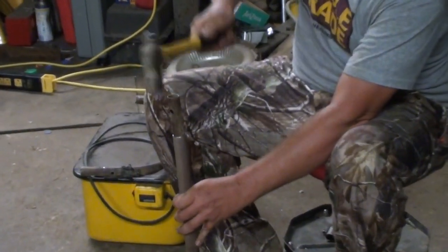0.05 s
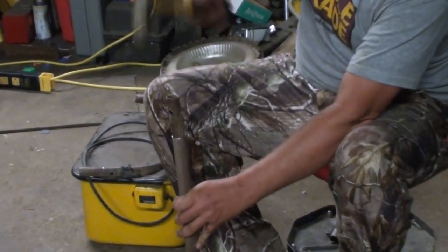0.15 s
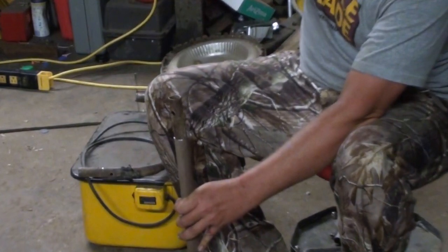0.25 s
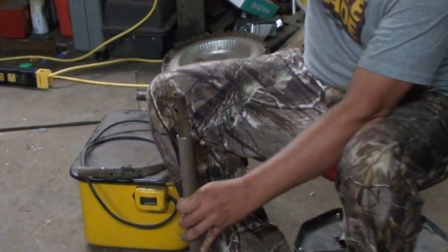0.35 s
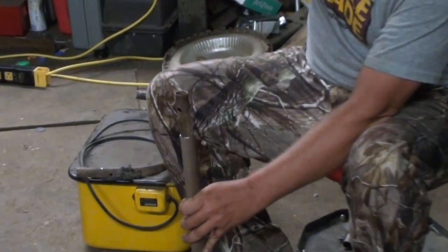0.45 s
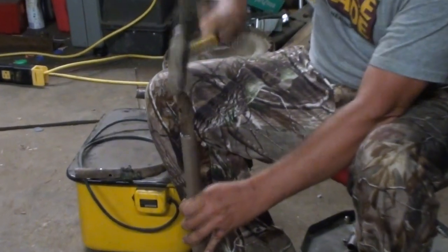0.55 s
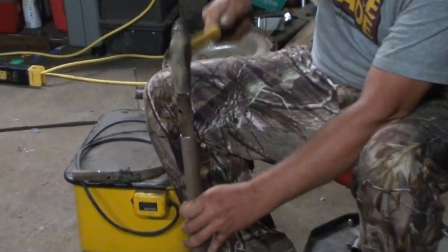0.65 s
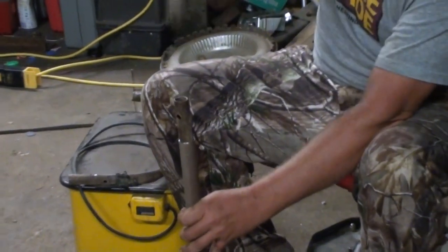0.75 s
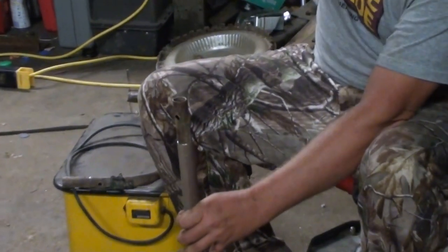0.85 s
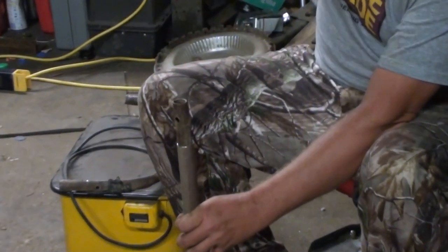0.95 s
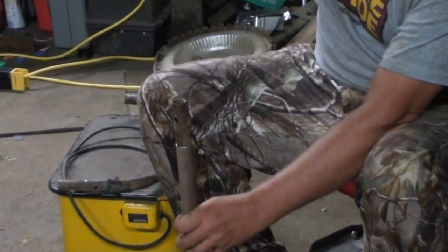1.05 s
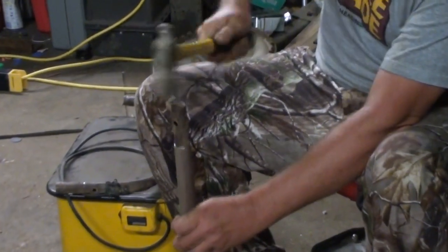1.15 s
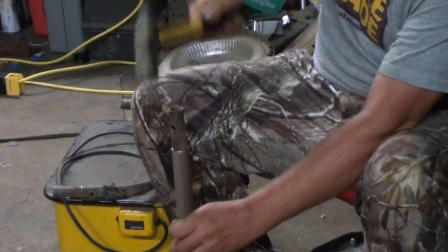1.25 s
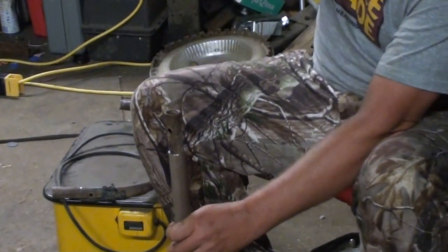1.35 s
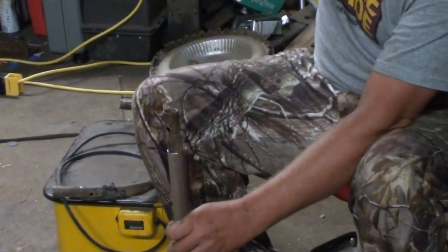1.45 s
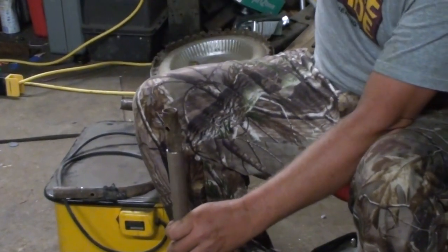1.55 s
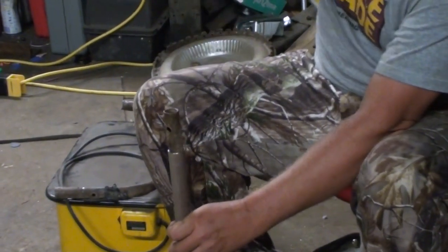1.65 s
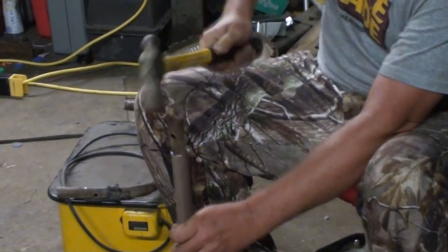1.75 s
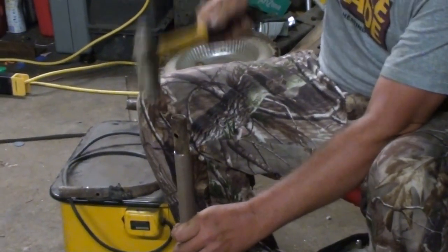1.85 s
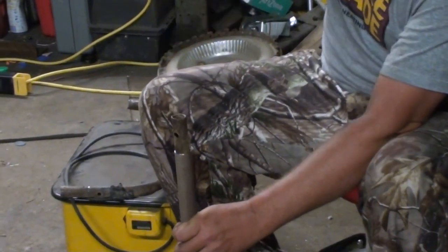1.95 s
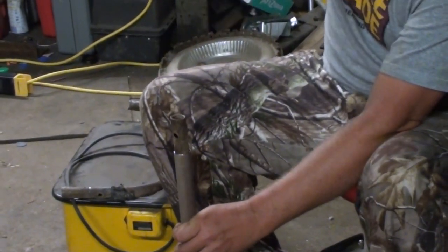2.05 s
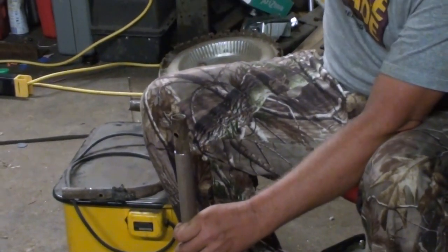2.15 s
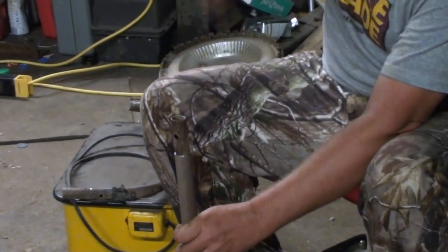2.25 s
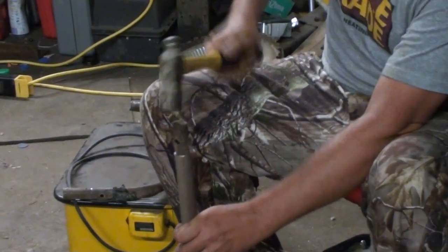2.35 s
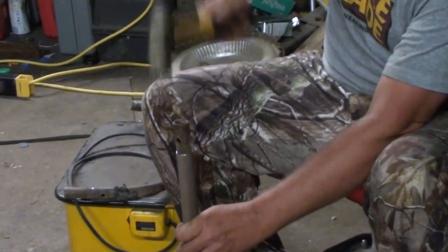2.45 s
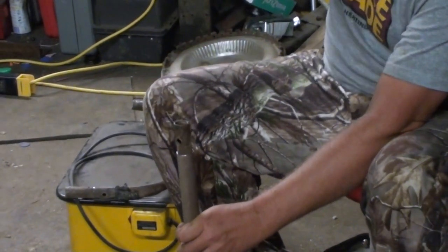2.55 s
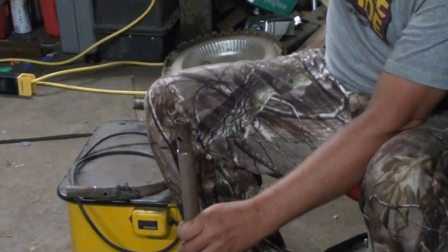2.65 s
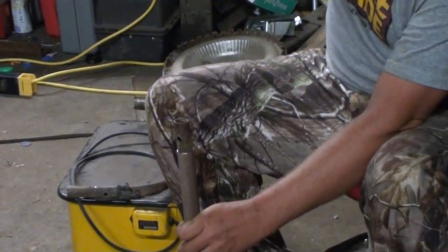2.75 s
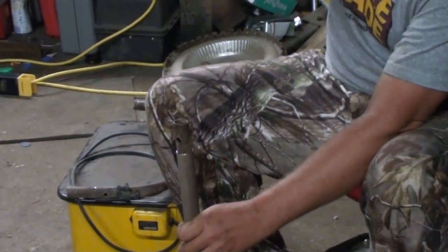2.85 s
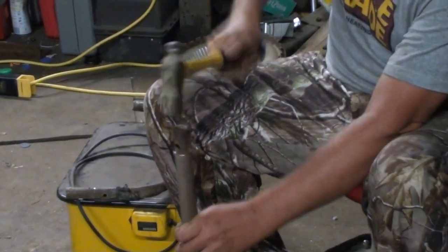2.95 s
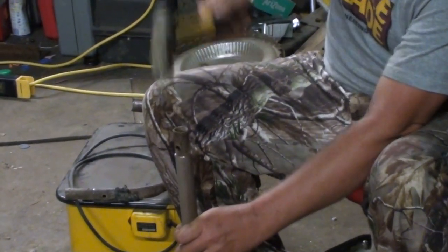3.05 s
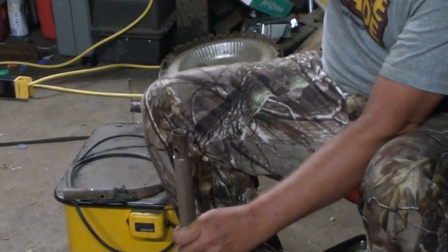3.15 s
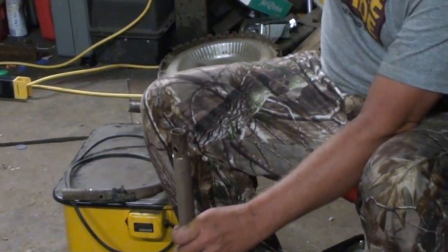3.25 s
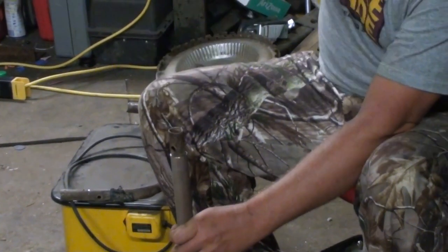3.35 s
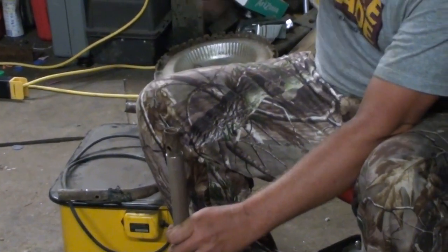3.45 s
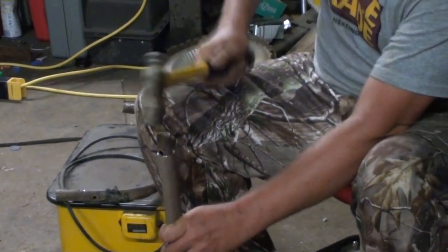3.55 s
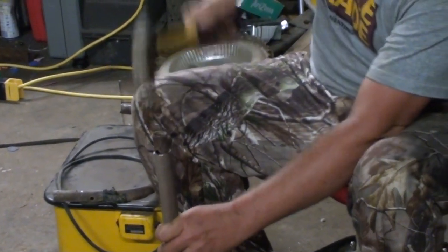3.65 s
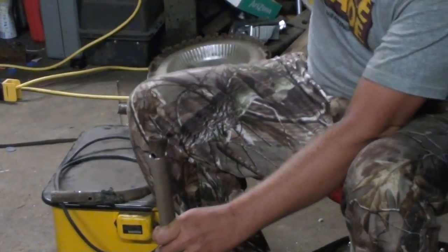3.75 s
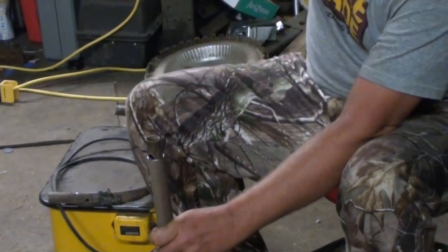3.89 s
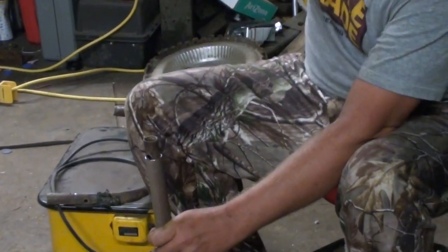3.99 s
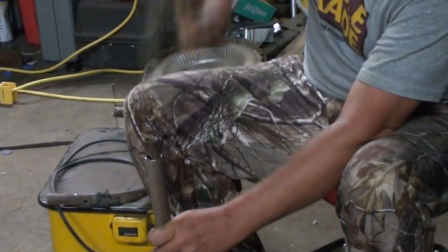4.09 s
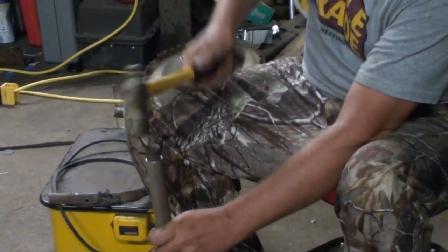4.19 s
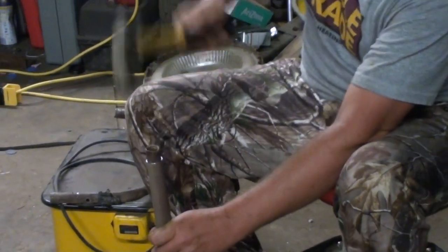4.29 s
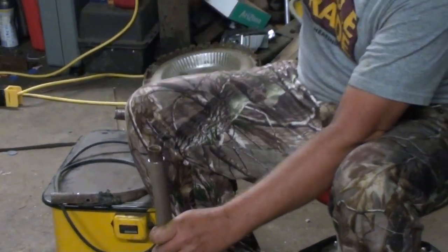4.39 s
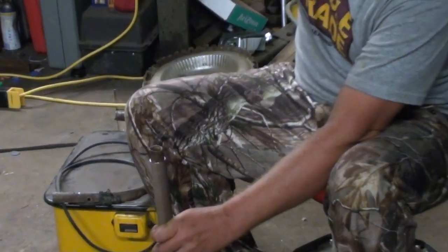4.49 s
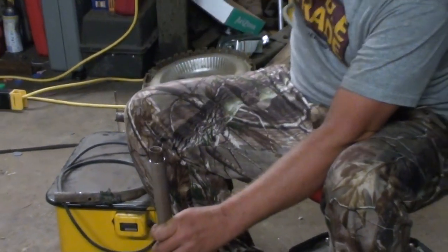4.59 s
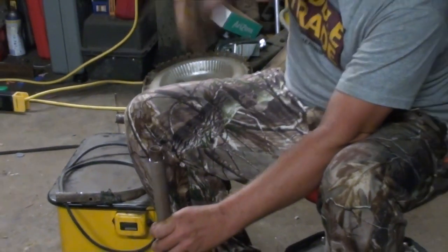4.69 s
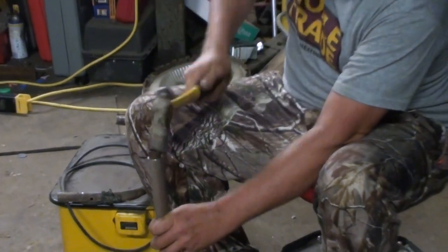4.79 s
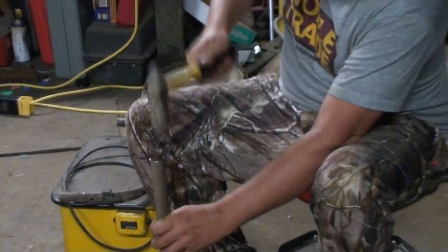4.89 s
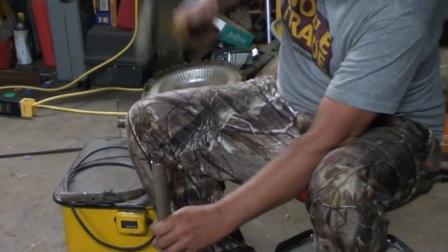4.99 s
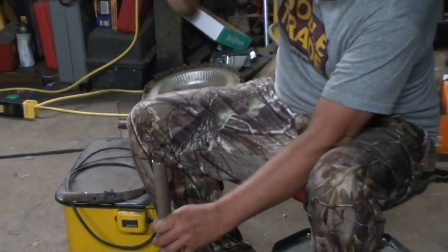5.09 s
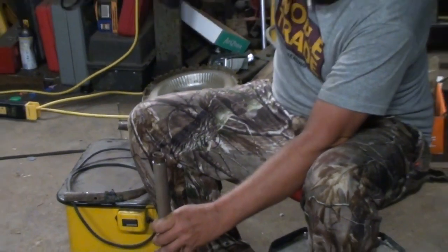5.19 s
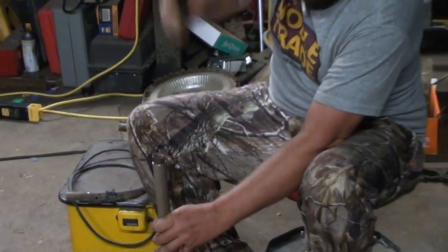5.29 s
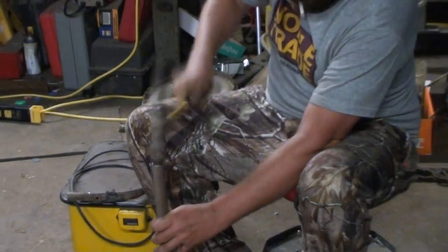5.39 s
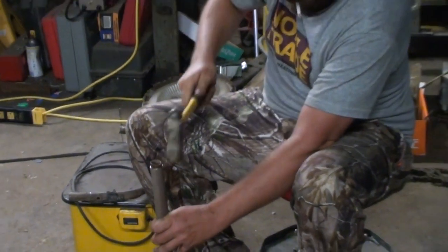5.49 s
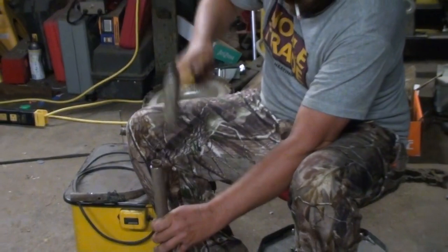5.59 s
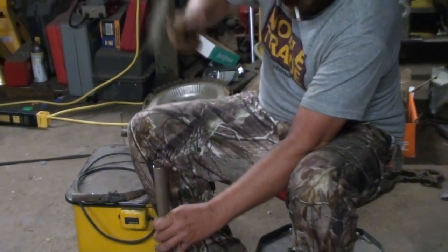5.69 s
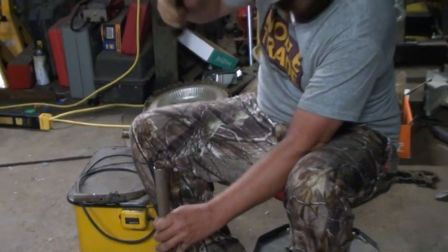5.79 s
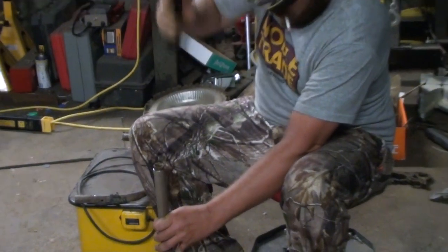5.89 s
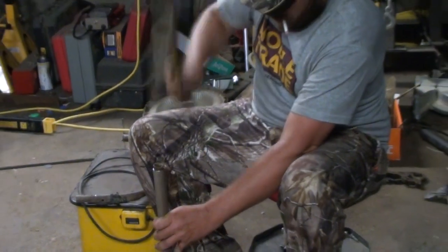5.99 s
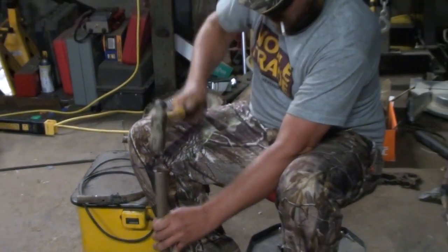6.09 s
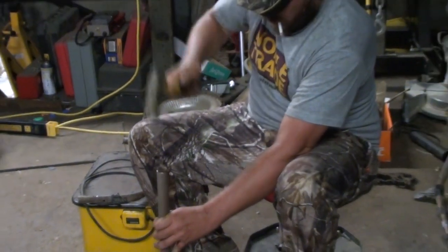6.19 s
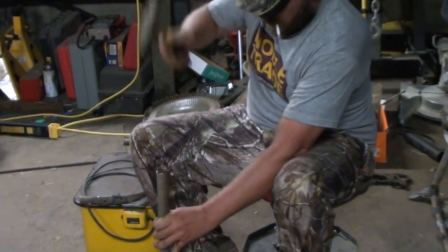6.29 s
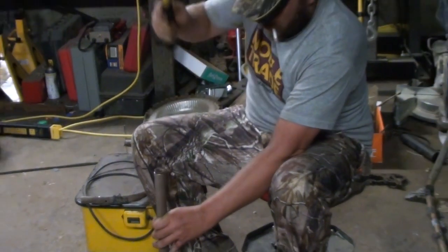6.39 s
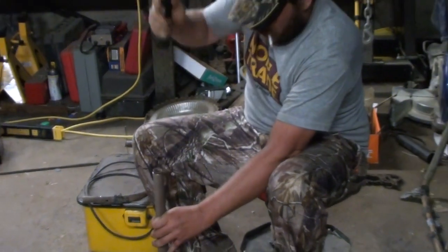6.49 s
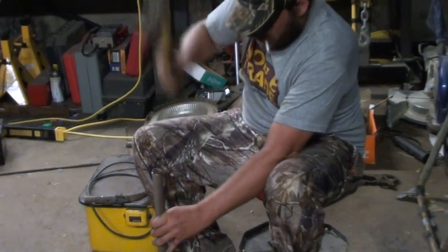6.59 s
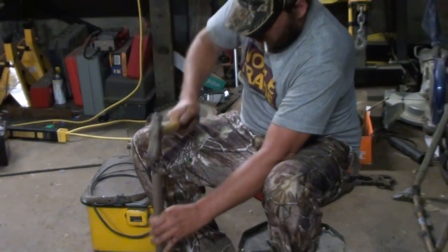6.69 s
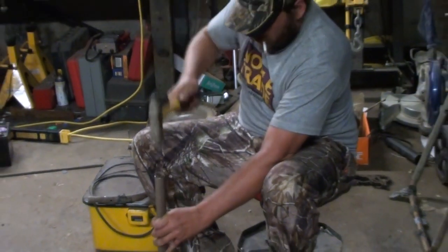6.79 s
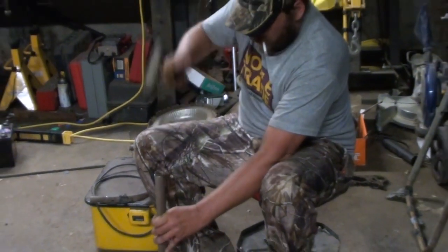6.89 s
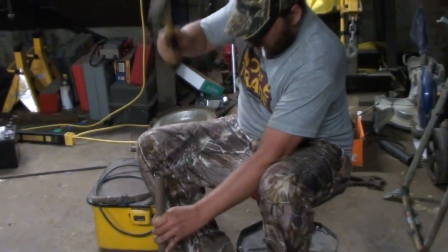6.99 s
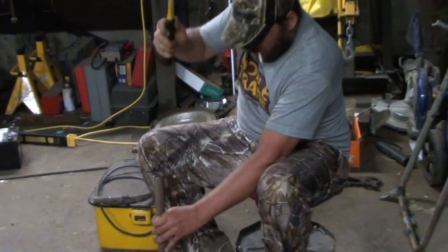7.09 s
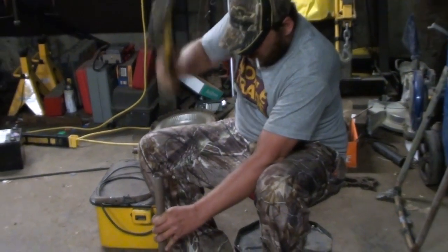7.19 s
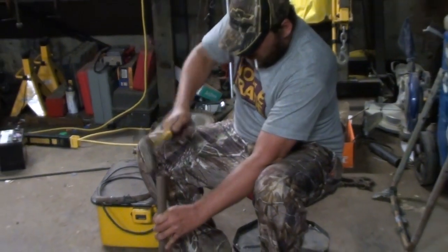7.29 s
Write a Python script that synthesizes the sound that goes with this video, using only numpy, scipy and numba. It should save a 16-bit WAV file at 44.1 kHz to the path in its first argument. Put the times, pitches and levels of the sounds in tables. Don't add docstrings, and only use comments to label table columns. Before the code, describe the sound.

Close by in a large, hard-walled garage, a hammer hits the end of a gripped steel tube at a steady 0.6-second pace. Each clank is sharp and bright, its own ring choked at once, leaving a dense echoing tail that overlaps the next blow. A hollow plastic case nearby answers with a dull low thump. Soft wind buffets the stereo microphone, whose limiting holds the tails up loud.

```python
import sys
import numpy as np
from scipy import signal
from scipy.fft import rfft, irfft, next_fast_len
from scipy.io import wavfile
from scipy.ndimage import uniform_filter1d, minimum_filter1d
from numba import njit

SR = 44100
rng = np.random.default_rng(int(sys.argv[2]) if len(sys.argv) > 2 else 0)


def boost_factor(decibels):
    exponent = np.asarray(decibels, float) / 20
    return 10 ** exponent


def log_audio(samples):
    frames = np.atleast_2d(samples).T
    limited = np.clip(frames, -1, 1)
    pcm = np.round(limited * 32767).astype(np.int16)
    wavfile.write(sys.argv[1], SR, pcm)


N = 323587
LEAD = SR

# t/s, strength/dB, thud/dB, body/dB, brightness/dB
BLOWS = [(0.067, 8.5, -4, -0.5, -1.5), (0.649, 9, -5.5, 0.5, -1), (1.223, 4.5, -0.7, 2, 3.3),
         (1.816, 7.5, -4, -1.5, 0), (2.408, 7, -2, -1.5, -1), (3.008, 8, -2.5, -0.5, 1),
         (3.614, 8.5, -3, -0.5, 2), (4.215, 4.5, 0, 2, 2), (4.848, 5.5, -1.5, 3.5, -2),
         (5.498, 8, -3, 3, 0), (6.134, 8.5, -0.2, 3.5, 0.5), (6.7656, 6, 4, 9, -2.5)]
EARLIER_BLOW = (-0.5, 8.5, -6, -1, -1)
# f/Hz, f/Hz, f/Hz, f/Hz, f/Hz
TUBE_MODES = [(3220, 1960, 1080, 9450, 8500), (3110, 3500, 2320, 4620, 1100),
              (5900, 1870, 1150, 6970, 5400), (6960, 2560, 6250, 3030, 8600),
              (6130, 7670, 5470, 9100, 4470), (6430, 1390, 7550, 2200, 4400),
              (8600, 1340, 3240, 6830, 2000), (7670, 8370, 6550, 8050, 3290), (5060, 943, 4030, 1680, 6450),
              (4430, 2710, 1520, 2180, 770), (2790, 2660, 1830, 9500, 9800), (2146, 2660, 9700, 5250, 6600)]
EARLIER_MODES = (2000, 3120, 4400, 6250, 8000)
# f/Hz, level per Hz/dB
STEEL_CRACK = [(59, -56), (100, -23.5), (255, -21.5), (302, -18.5), (343, -18), (398, -14.5), (600, -22.5),
               (900, -12.5), (1870, -2), (3120, -3.5), (3860, -4.5), (6840, -4), (14400, -32), (16000, -32)]
# f/Hz, level/dB
CLOSE_BRIGHTNESS = [(250, 4), (1500, -1.5), (3000, -2), (5000, -1.5), (8000, 4.5), (10000, 3.5), (14000, 5)]
# f/Hz, T60/s
HALL_T60 = [(100, 0.82), (400, 0.73), (1000, 0.91), (2500, 0.96), (5500, 0.85), (9000, 0.66), (14000, 0.42)]
# f/Hz, level/dB
HALL_COLOUR = [(300, 1), (5000, 0), (9000, -3), (14000, -5)]
# delay/s, level/dB
EARLY_ECHOES = [(.0025, -3), (.005, -4), (.008, -14), (0.013, -6), (0.019, -2.5), (0.028, -4), (0.035, -3)]
# f/Hz, side minus mid/dB
STEREO_WIDTH = [(60, -24), (110, -42), (200, -42), (380, -26), (700, -21), (1290, -19), (2380, -17),
                (4400, -13), (8120, -14), (15000, -27)]
# f/Hz, level per Hz/dB
PORT_TURBULENCE = [(12, -26), (20, -16), (57, 0.5), (129, 7), (370, -11), (409, -23), (464, -8.5),
                   (528, -64), (600, -48), (780, -48), (1320, -120)]
# f/Hz, side minus mid/dB
PORT_WIDTH = [(25, -17), (60, -17), (130, -8), (300, -3.5)]
# peak t/s, length/s, level/dB
GUSTS = [(0.0, 0.067, -39), (0.2, 0.068, -43), (0.543, 0.065, -38.5), (2.755, 0.21, -43),
         (2.886, 0.062, -30.5), (2.956, .05, -33), (3.082, .12, -49), (3.32, 0.11, -34.5),
         (3.445, 0.21, -42.5), (3.695, .1, -33), (3.776, 0.17, -32), (3.86, 0.11, -34), (3.987, 0.055, -37),
         (4.075, 0.15, -39.5), (4.427, 0.19, -32.5), (4.543, 0.14, -45), (4.672, 0.17, -47),
         (4.78, 0.066, -26.5), (5.34, 0.038, -37), (5.48, .1, -41), (5.663, 0.11, -42), (5.82, .08, -37.5),
         (6.117, 0.041, -44), (6.182, 0.11, -30), (6.27, 0.17, -32), (6.413, 0.15, -35.5),
         (6.619, 0.21, -46), (6.817, 0.097, -37), (6.994, .2, -51), (7.34, 0.031, -39)]
# t/s, level/dB
BREEZE = [(0, -62), (0.7, -78), (2.2, -82), (2.4, -52), (5.0, -50), (6.0, -49), (7.34, -59)]
# f/Hz, level per Hz/dB
GARAGE_AIR = [(30, -26), (100, -7), (190, -11), (224, 3), (260, -2.5), (450, -3.5), (700, -7), (2500, -4.5),
              (7000, -31), (10000, -34), (16000, -28)]

GUST_RISE = 0.64
STRONGEST_MODE_DB, MODE_STEP_DB = 7.5, 1.08
MODE_WIDTH_HZ, MODE_WIDENING = 156, 0.034
MIC_TOP_HZ, STEREO_TOP_HZ = 15900, 10800


def set_rms(x, db):
    return x * boost_factor(db) / np.sqrt(np.mean(x ** 2))


def on_log(table, hz):
    f, value = np.transpose(table)
    return np.interp(np.log(hz + 1), np.log(f), value)


def colour(x, table):
    length = x.shape[-1]
    n = next_fast_len(length)
    gain = boost_factor(on_log(table, np.fft.rfftfreq(n, 1 / SR)))
    return irfft(rfft(x, n) * gain, n)[..., :length]


def resonance(hz, centre_hz, width_hz):
    damping = 1j * hz * width_hz
    return damping / (centre_hz ** 2 - hz ** 2 + damping)


def walk(rate_hz):
    hold = int(SR / rate_hz)
    steps = np.repeat(rng.standard_normal(N // hold + 1), hold)
    return 1.2 * uniform_filter1d(steps, hold)[:N]


def clank(thud_db, body_db, bright_db, modes, size=2048):
    t, hz = np.arange(size) / SR, np.fft.rfftfreq(size, 1 / SR)
    chance = rng.standard_normal((2, size))
    lag = 0.0042 + 0.0045 * uniform_filter1d(chance[0, :len(hz)], size=12)
    click = np.exp(-2j * np.pi * np.cumsum(np.maximum(lag, 0.0025)) * SR / size)
    chatter = rfft(chance[1] * t ** 2 * np.exp(-t / 0.002))
    chatter = boost_factor(-18) * chatter / np.sqrt(np.mean(np.abs(chatter) ** 2))

    peaks_db = np.maximum(STRONGEST_MODE_DB - MODE_STEP_DB * np.arange(len(modes)), 0)
    power = 1
    for f, db in zip(modes, peaks_db):
        mode = resonance(hz, f, MODE_WIDTH_HZ + MODE_WIDENING * f)
        power = power + (boost_factor(2 * db) - 1) * np.abs(mode) ** 3
    ring = np.sqrt(power)

    touch = [(350, thud_db), (850, body_db), (2200, 0), (6500, 0), (10000, bright_db)]  # f/Hz, level/dB
    steel_db = on_log(STEEL_CRACK, hz) + on_log(CLOSE_BRIGHTNESS, hz) + on_log(touch, hz)
    sound = irfft((click + chatter) * ring * boost_factor(steel_db), size)
    return sound * np.minimum(t / 0.0018, 1) ** 2


def hall(tail_db, size=32768):
    t, hz = np.arange(size) / SR, np.fft.rfftfreq(size, 1 / SR)
    noise, tail = rfft(rng.standard_normal(size)), 0
    for centre in 60 * 2 ** np.arange(0, 8.5, 0.5):
        band = np.cos(np.pi * np.clip(np.log2((hz + 1) / centre), -0.5, 0.5)) ** 2
        decay = np.exp(-np.log(1000) * t / on_log(HALL_T60, centre))
        tail = tail + boost_factor(on_log(HALL_COLOUR, centre)) * irfft(noise * band, size) * decay
    response = boost_factor(tail_db) * tail * (1 - np.exp(-(t / 0.01) ** 2))
    for delay, db in EARLY_ECHOES:
        response[int(delay * SR)] += boost_factor(db) * rng.choice([-1, 1])
    return response


def hammering():
    stances = np.zeros((3, N + LEAD + 2048))
    modes = [EARLIER_MODES, *TUBE_MODES]
    for k, (s, db, *touch) in enumerate([EARLIER_BLOW, *BLOWS]):
        sound = clank(*touch, modes[k])
        at = int((s - 0.003) * SR) + LEAD
        stances[k % 3, at:at + len(sound)] += boost_factor(db + 23) * sound
    all_blows = stances.sum(axis=0)
    mid = sum(signal.oaconvolve(blows, hall(tail_db=-24)) for blows in stances)[LEAD:N + LEAD]
    side = signal.oaconvolve(all_blows, hall(tail_db=-21))[LEAD:N + LEAD]
    direct = all_blows[LEAD:N + LEAD]
    return np.array([mid + direct, colour(side + 0.4 * direct, STEREO_WIDTH)])


def draught():
    t = np.arange(N) / SR
    flow = boost_factor(np.interp(t, *np.transpose(BREEZE)))
    for s, length, db in GUSTS:
        span = length * np.where(t < s, GUST_RISE, 1)
        flow = flow + boost_factor(db) * np.exp(-(2 * (t - s) / span) ** 2)
    mid, side = set_rms(colour(rng.standard_normal((2, N)), PORT_TURBULENCE), 0)
    lumps = boost_factor(1.26 * walk(25) - 3.0)
    return np.array([mid, colour(side, PORT_WIDTH)]) * flow * lumps


def air():
    noise = set_rms(colour(rng.standard_normal((2, N)), GARAGE_AIR), -45.5)
    swell = boost_factor(1.5 * walk(3))
    return noise * swell * np.array([[1], [boost_factor(-18.5)]])


def case():
    t, out = np.arange(SR) / SR, np.zeros(N + SR)
    sweep = np.sin(2 * np.pi * (95 * t + 1400 * t ** 2))
    yelp = sweep * (t / 0.036) * np.exp(-(t / 0.046) ** 2)
    for s, db, thud_db, *_ in BLOWS:
        wobble = 1.0 + 1.23 * walk(43.5)[:SR]
        swell = (1 - np.exp(-t / 0.029)) * np.exp(-t / 0.23)
        hum = wobble * np.sin(2 * np.pi * 225 * t) * swell
        at = int(s * SR)
        out[at:at + SR] += boost_factor(db + 2.2 * thud_db) * (boost_factor(-30) * yelp + boost_factor(-52) * hum)
    return out[:N] * np.array([[1], [0.2]])


def scene():
    mid, side = hammering() + case() + draught() + air()
    return np.array([(mid + side) * boost_factor(-1.2), (mid - side) * boost_factor(-1.5)])


@njit
def recover(gain, release):
    out, g = np.empty(len(gain)), 1.
    for i in range(len(gain)):
        g = min(gain[i], g + (1 - g) * release)
        out[i] = g
    return out


def low_pass(x):
    return signal.sosfilt(signal.butter(12, 16470, fs=SR, output="sos"), x)


def record(dry):
    loudness = np.sqrt(uniform_filter1d(np.mean(dry ** 2, axis=0), size=64) + 1e-12)
    wanted = minimum_filter1d(np.minimum(1, boost_factor(-12.5) / loudness), size=96)
    gain = uniform_filter1d(recover(wanted, 1 / (0.08 * SR)), size=96)
    left, right = np.tanh(1.073 * dry * gain) / 1.031
    mic_top = signal.butter(8, MIC_TOP_HZ, fs=SR, output="sos")
    stereo_top = signal.butter(4, STEREO_TOP_HZ, fs=SR, output="sos")
    mid = signal.sosfiltfilt(mic_top, (left + right) / 2)
    side = signal.sosfiltfilt(stereo_top, (left - right) / 2)
    return low_pass(np.array([mid + side, mid - side]))


dry = scene()
out = record(dry)
log_audio(out)
```